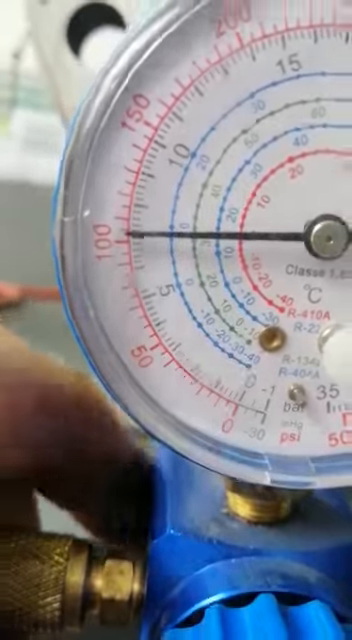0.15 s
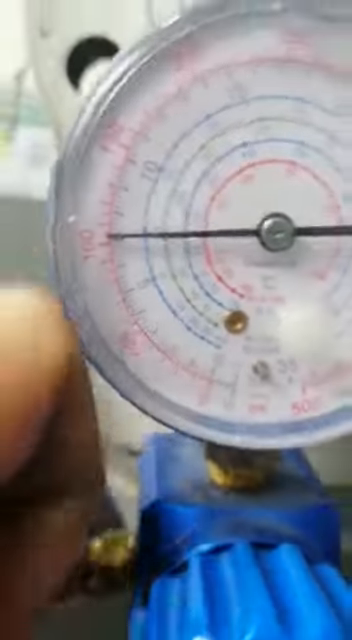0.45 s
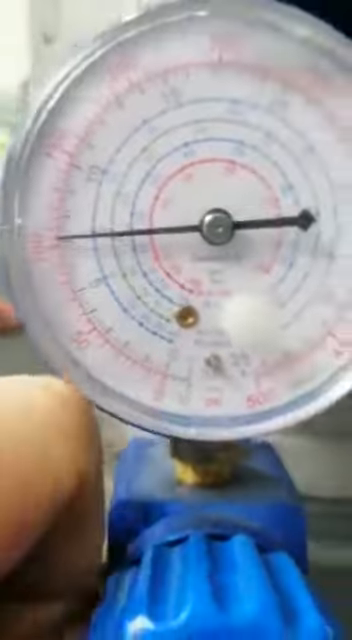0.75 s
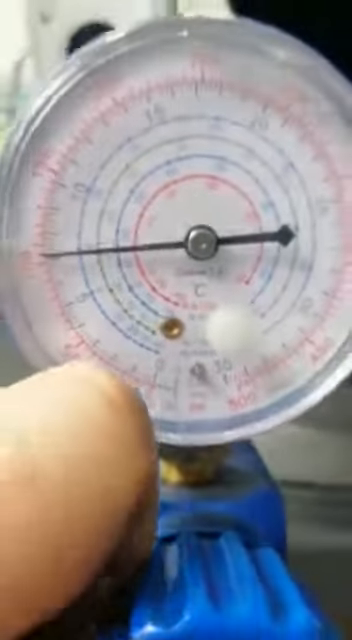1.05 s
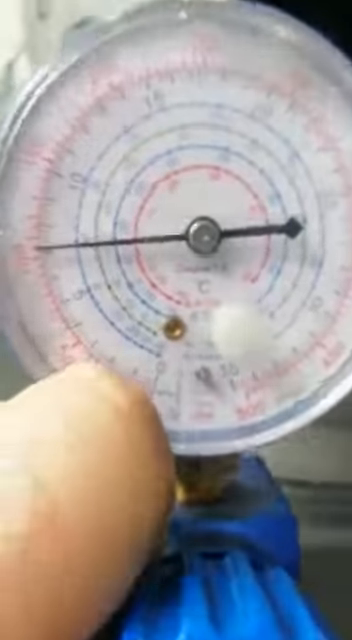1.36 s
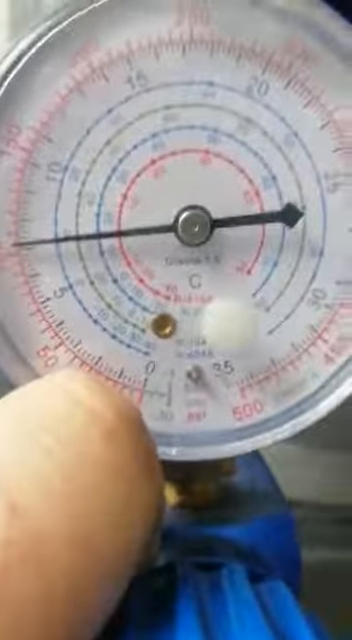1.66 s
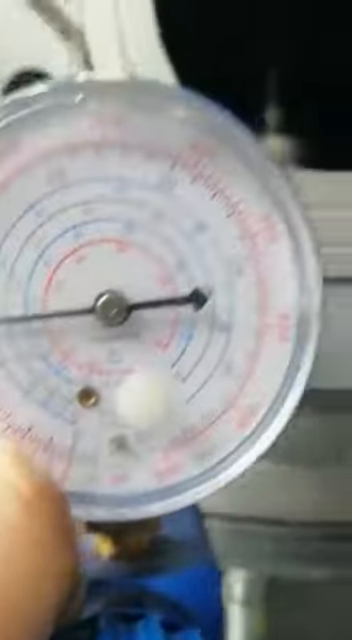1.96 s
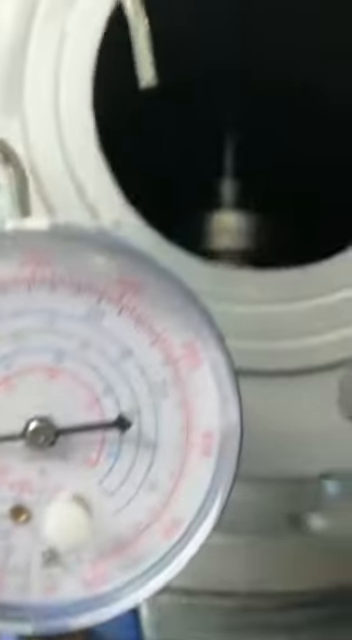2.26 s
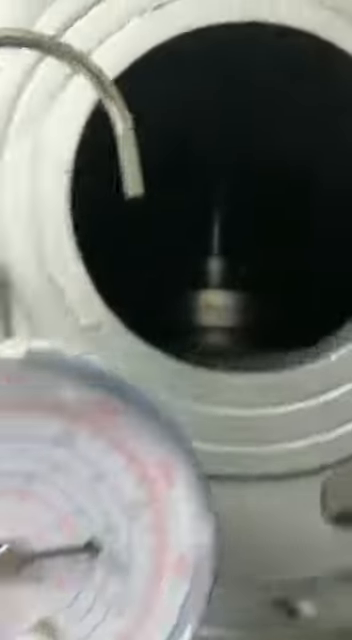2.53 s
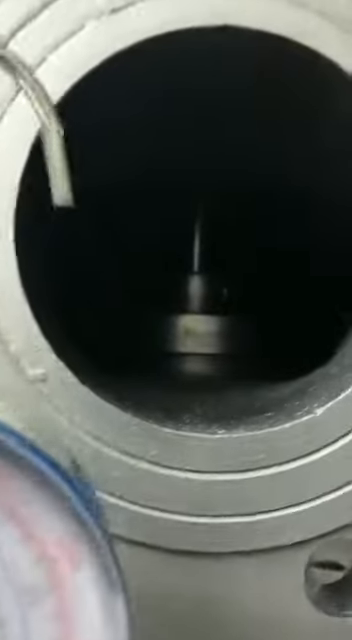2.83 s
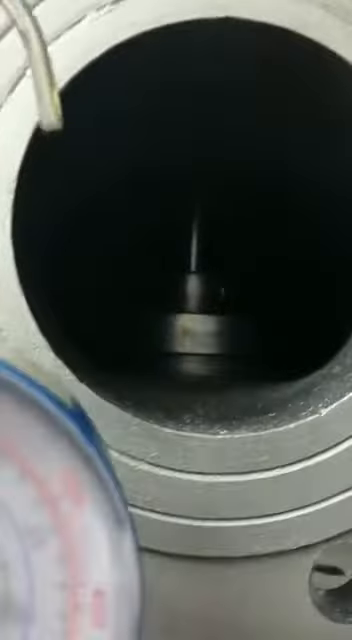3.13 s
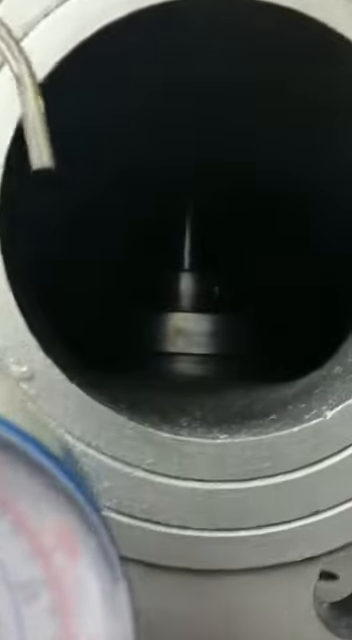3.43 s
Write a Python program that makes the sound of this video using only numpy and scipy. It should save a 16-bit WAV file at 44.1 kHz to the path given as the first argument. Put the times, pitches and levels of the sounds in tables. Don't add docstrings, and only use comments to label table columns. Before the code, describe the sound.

Pressurised air escapes from a valve close to a handheld phone in a hard, echoing workshop. At 0 s the hiss is bright and full, over the low boom and metallic ringing of an earlier release dying away. It weakens and darkens steadily, more hollow around 1.7 s, with faint thin whistles. From about 1.4 s a low motor hum rises in pitch, throbbing with mains buzz until 3.6 s.

```python
import sys
import numpy as np
from scipy import signal
from scipy.fft import rfft, irfft, next_fast_len
from scipy.io import wavfile
from scipy.ndimage import uniform_filter1d

SR = 44100
rng = np.random.default_rng(int(sys.argv[2]) if len(sys.argv) > 2 else 0)


def voltage_ratio(level):
    return 10 ** (np.asarray(level, float) / 20)


def unload_audio(sound):
    columns = np.transpose(np.atleast_2d(sound))
    steps = np.round(np.clip(columns, -1, 1) * 32767)
    wavfile.write(sys.argv[1], SR, steps.astype(np.int16))


N = 158319
T = np.arange(N) / SR
SIZE = next_fast_len(N)
F = np.maximum(np.arange(SIZE // 2 + 1) * SR / SIZE, 1)

# [t/s, jet strength/dB, phone facing the chamber/dB]
PRESSURE = [
    (0, -34, -6),
    (.6, -35, -2),
    (.9, -36, -2.5),
    (1.3, -35, -1),
    (1.7, -38, 1.5),
    (2.1, -39, -1.5),
    (2.8, -41, -3.5),
    (3.3, -42.5, -5.5),
    (3.59, -43.5, -9),
]


def column(table, k, at_s):
    table = np.array(table)
    return np.interp(at_s, table[:, 0], table[:, k])


def curve(table, hz):
    table = np.array(table)
    return np.interp(np.log(hz), np.log(table[:, 0]), table[:, 1])


def pressure_drop_db():
    return column(PRESSURE, 1, T) - PRESSURE[0][1]


def walk(rate_hz):
    hold = int(SR / rate_hz)
    levels = np.repeat(rng.standard_normal(200), hold)[:N]
    return 1.3 * uniform_filter1d(uniform_filter1d(levels, hold), hold)


def pair_noise():
    # [f/Hz, likeness 0-1]
    likeness = [(60, 0.8), (130, 0.98), (290, 0.8), (640, 0.41), (1400, 0.04), (2500, 0.08), (6780, 0),
                (13000, 0)]
    lag_s, lag_from_hz = 0.0004015, 1415
    a, b = rfft(rng.standard_normal((2, SIZE))) * np.sqrt(SR / 2)
    like = np.clip(curve(likeness, F), 0, 1)
    mid = a * np.sqrt((1 + like) / 2)
    side = b * np.sqrt((1 - like) / 2)
    lag = np.exp(-2j * np.pi * lag_s * np.maximum(F - lag_from_hz, 0))
    return np.array([mid + side, (mid - side) * lag])


def boom():
    # [f/Hz, density/dB per Hz]
    spectrum = [(90, -25), (150, -3), (200, -3), (330, -2.5), (450, -4.5), (600, -11), (900, -8),
                (1400, -40)]
    level_db, t60_s = -41.5, 2
    late_db, late_t60_s = -10.5, 4
    octaves_outside = np.abs(np.log2(F / np.clip(F, spectrum[0][0], spectrum[-1][0])))
    shape_db = curve(spectrum, F) - 20 * octaves_outside
    tail = irfft(pair_noise() * voltage_ratio(shape_db), SIZE)[:, :N]
    fade = voltage_ratio(-60 * T / t60_s) + voltage_ratio(late_db - 60 * T / late_t60_s)
    return tail / np.std(tail) * voltage_ratio(level_db) * fade


def ring():
    # [f/Hz, level/dB, t60/s]
    modes = [(169, 1, 1.6), (291, -5, 1.9), (332.5, 1, 1.8)]
    level_db = -48
    start = 2 * np.pi * rng.random(len(modes))
    total = 0
    for (hz, db, t60_s), phase in zip(modes, start):
        total = total + voltage_ratio(db - 60 * T / t60_s) * np.sin(2 * np.pi * hz * T + phase)
    return voltage_ratio(level_db) * total


def motor():
    # [t/s, f/Hz, level/dB]
    run_up = [(1.42, 55.5, -58), (1.49, 55.7, -52.5), (1.77, 56.5, -52.5), (1.85, 58.7, -66.5),
              (1.94, 59.4, -52), (2.2, 60.3, -52), (2.4, 62, -54.5), (2.53, 63.7, -65), (2.56, 64.1, -50),
              (2.78, 65.7, -48), (2.83, 65.7, -62), (2.9, 66.6, -55), (3.12, 67.2, -51),
              (3.18, 67.2, -48.5), (3.35, 68.3, -46), (3.59, 68.2, -47)]
    # [t/s, level/dB]
    buzz_level = [
        (1.6, -76),
        (1.97, -67),
        (2.05, -59.5),
        (2.25, -55),
        (2.5, -66),
        (3.25, -70.5),
        (3.35, -57.5),
        (3.59, -54.5),
    ]
    second_db, rise_s, buzz_hz = -14.5, 0.092, 119
    phase = 2 * np.pi * np.cumsum(column(run_up, 1, T)) / SR
    rise = np.exp(np.minimum(T - run_up[0][0], 0) / rise_s)
    second = voltage_ratio(second_db + 2.9 * walk(5.55)) * np.sin(2 * phase)
    hum = voltage_ratio(column(run_up, 2, T)) * (np.sin(phase) + second)
    buzz = voltage_ratio(column(buzz_level, 1, T)) * np.sin(2 * np.pi * buzz_hz * T)
    return np.sqrt(2) * rise * (hum + buzz)


def whistles():
    # [f/Hz, level/dB]
    tones = [(1491, -63), (2466, -57), (2541, -56), (3187, -55.5), (5410, -60), (5835, -60), (6735, -60),
             (7079, -59)]
    width_hz, level_db, follow = 2.2, 0, 0.5
    density = 0
    for hz, db in tones:
        density = density + voltage_ratio(2 * db) / width_hz / (1 + (2 * (F - hz) / width_hz) ** 2)
    noise = irfft(pair_noise() * np.sqrt(density), SIZE)[:, :N]
    return voltage_ratio(level_db + follow * pressure_drop_db()) * noise


def air():
    # [f/Hz, density/dB per Hz]
    jet = [(900, -52), (1800, -11.5), (2600, -3), (3800, -2), (5500, -2), (7700, -1.5), (9500, -6),
           (15000, -16)]
    # [f/Hz, density/dB per Hz]
    leak = [(24, -21), (33, -3.5), (75, -5), (110, -5.5), (300, -6.5), (750, -6.5), (1500, -2),
            (11000, -3.5)]
    jet_level_db, jet_follow, slide_oct_per_db = -65.5, 1.044, 0.09
    leak_level_db, leak_follow, leak_top_db_per_oct = -74, 0.095, -12
    chamber_hz, chamber_oct, chamber_level_db = 2550, 0.55, -71
    nozzle_hz, nozzle_oct, nozzle_level_db, nozzle_follow = 5950, 0.33, -66.5, 3.8
    swell_db, swell_hz, flicker_db, flicker_hz = 0.2, 7, 0.45, 9

    drop_db = pressure_drop_db()
    facing_db = column(PRESSURE, 2, T)
    noise = pair_noise()
    swell = walk(swell_hz)
    out = 0
    for hz in 25 * 2 ** (np.arange(29) / 3):
        jet_db = jet_level_db + jet_follow * drop_db + curve(jet, hz * 2 ** (-slide_oct_per_db * drop_db))
        jet_db = jet_db - 20 * max(np.log2(jet[0][0] / hz), 0)
        leak_db = leak_level_db + leak_follow * drop_db + curve(leak, hz)
        leak_db = leak_db + leak_top_db_per_oct * max(np.log2(hz / leak[-1][0]), 0)
        chamber_db = chamber_level_db + facing_db - 10 * (np.log2(hz / chamber_hz) / chamber_oct) ** 2
        nozzle_db = nozzle_level_db + nozzle_follow * drop_db
        nozzle_db = nozzle_db - 10 * (np.log2(hz / nozzle_hz) / nozzle_oct) ** 2
        power = voltage_ratio(2 * jet_db) + voltage_ratio(2 * nozzle_db) + voltage_ratio(2 * leak_db) + voltage_ratio(2 * chamber_db)
        gain = np.sqrt(power) * voltage_ratio(swell_db * swell + flicker_db * walk(flicker_hz))
        away = np.clip(3 * np.log2(F / hz), -1, 1)
        band = np.cos(away * np.pi / 2) ** 2
        out = out + gain * irfft(noise * band, SIZE)[:, :N]
    return out


def bench(x):
    echo_db, t60_s = -10, 0.9
    cloud = rng.standard_normal((2, SR // 2)) * voltage_ratio(-60 * T[:SR // 2] / t60_s)
    cloud = cloud * voltage_ratio(echo_db) / np.linalg.norm(cloud, axis=1, keepdims=True)
    echoes = rfft(cloud, SIZE) * np.clip(F / 1500, 0, 1)
    return irfft(rfft(x, SIZE) * (1 + echoes), SIZE)[:, :N]


def scene():
    return boom() + ring() + motor() + whistles() + bench(air())


def low_pass(x):
    return signal.sosfilt(signal.butter(12, 15520, fs=SR, output="sos"), x)


def record(dry):
    # [f/Hz, width/Hz, level/dB]
    left_port = [(1300, 280, 3), (2900, 300, 1), (4050, 500, 0.5), (5300, 510, 0.3), (8380, 800, -8),
                 (10000, 470, -1), (10840, 1260, 6.5), (12100, 600, 3.5), (13300, 570, -7)]
    # [f/Hz, width/Hz, level/dB]
    right_port = [(674, 210, -1), (1350, 240, 2), (3600, 770, 1.5), (4450, 1000, -3), (5800, 420, 0.5),
                  (6480, 620, -4.5), (8460, 280, -2.5), (9300, 1150, 6.5), (11700, 900, -2)]
    # [f/Hz, left minus right/dB]
    balance = [(60, -5), (140, -4), (280, -7.5), (600, -4), (1200, -7.5), (3000, -3), (7000, -5.5),
               (12000, 3.5)]
    top_hz = 15170
    ports_db = []
    for port in (left_port, right_port):
        ports_db.append(sum(db / (1 + (2 * (F - hz) / width_hz) ** 2) for hz, width_hz, db in port))
    tilt_db = curve(balance, F) / 2
    response = voltage_ratio(np.array(ports_db) + [tilt_db, -tilt_db]) * (F < top_hz)
    mix = irfft(rfft(dry, SIZE) * response, SIZE)[:, :N]
    return low_pass(mix)


dry = scene()
out = record(dry)
unload_audio(out)
```